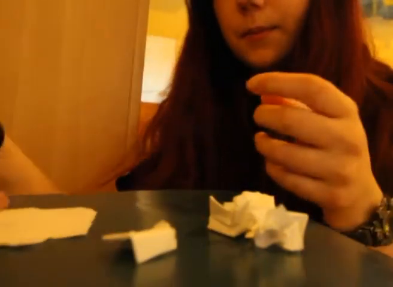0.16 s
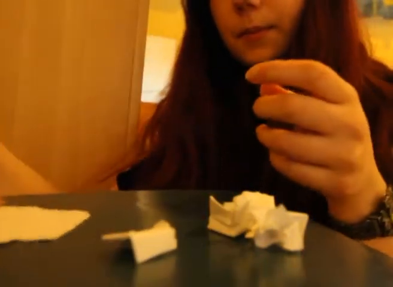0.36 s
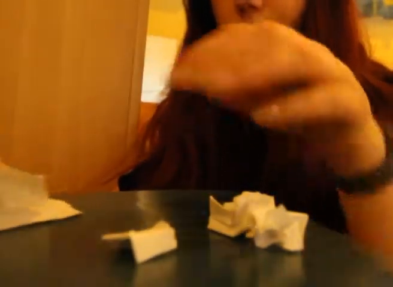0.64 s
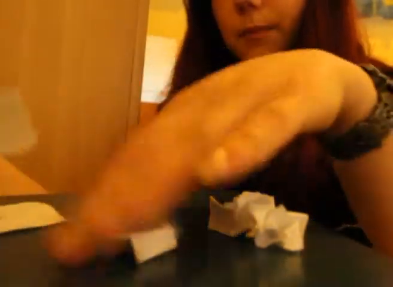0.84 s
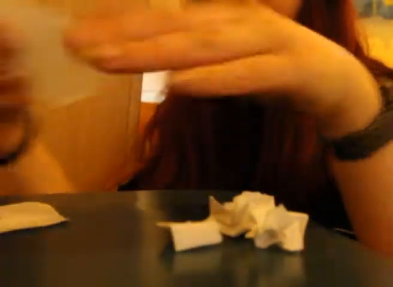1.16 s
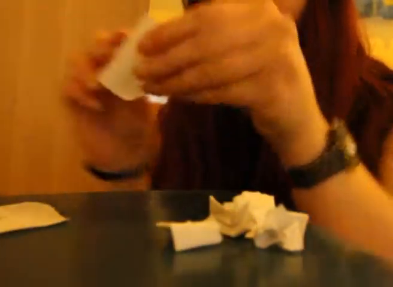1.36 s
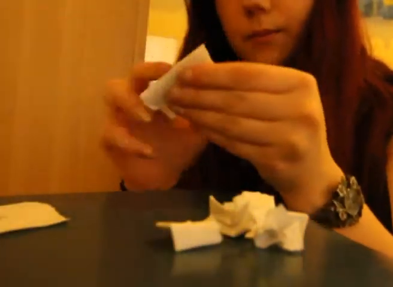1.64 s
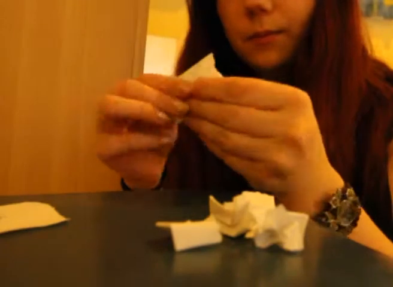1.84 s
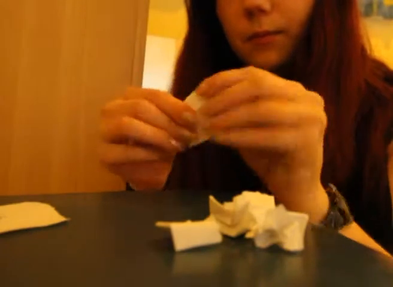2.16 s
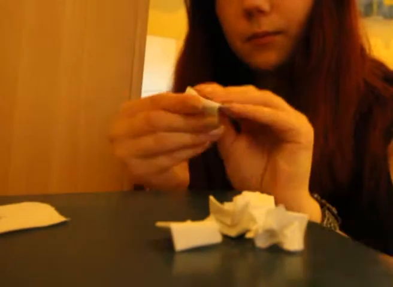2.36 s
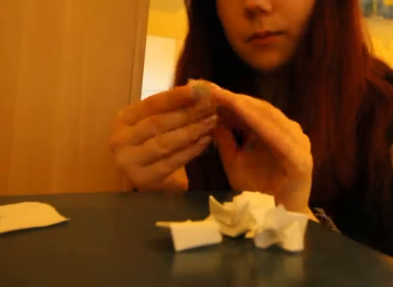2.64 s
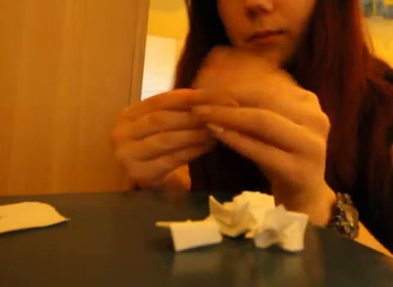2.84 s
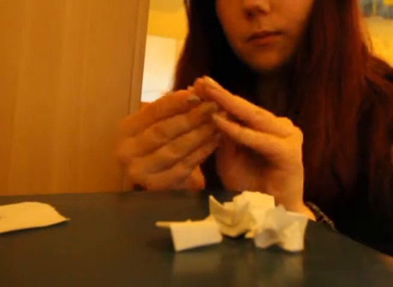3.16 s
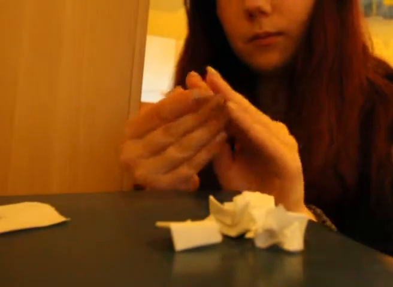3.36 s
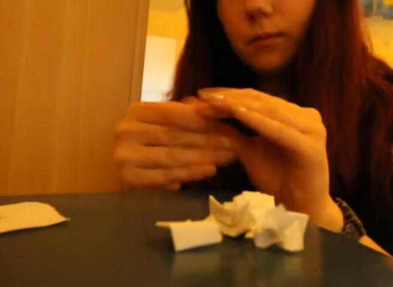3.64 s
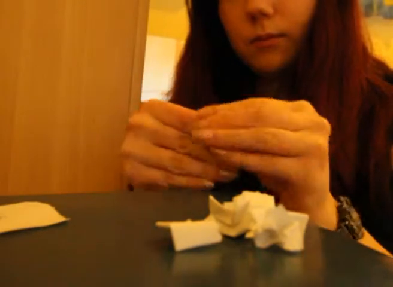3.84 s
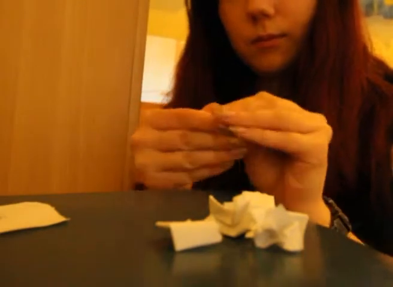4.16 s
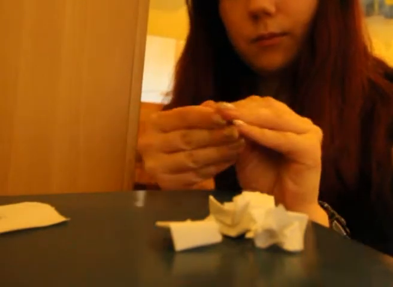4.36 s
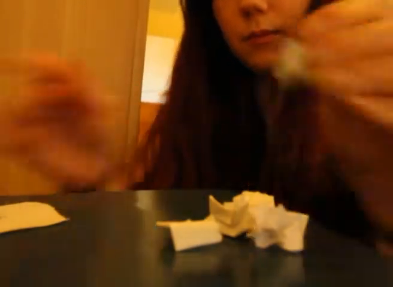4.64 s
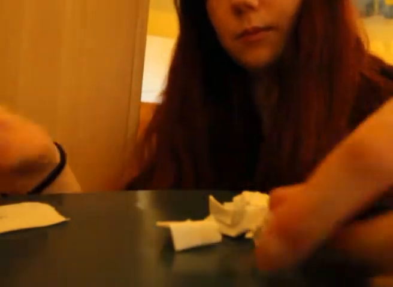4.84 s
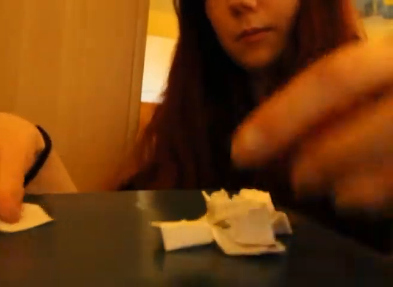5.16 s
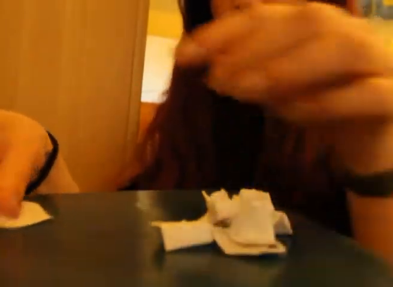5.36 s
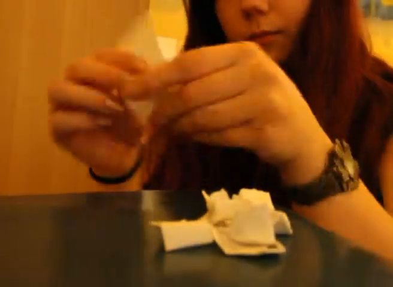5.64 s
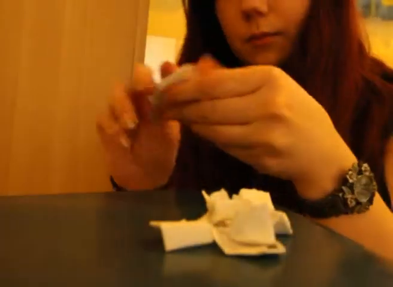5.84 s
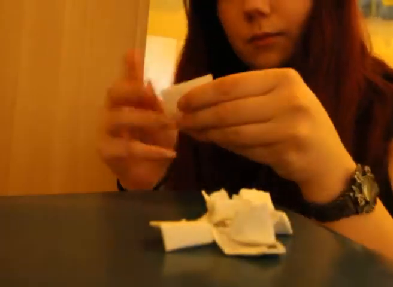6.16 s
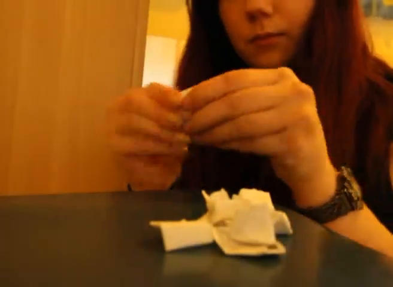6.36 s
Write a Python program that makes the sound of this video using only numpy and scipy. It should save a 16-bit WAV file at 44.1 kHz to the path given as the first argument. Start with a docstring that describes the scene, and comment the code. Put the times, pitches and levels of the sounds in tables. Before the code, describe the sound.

Close, dry paper handling: sharp creasing snaps and hissy rustles, a quieter fiddly folding stretch, then table bumps and louder crinkling over faint room hum.

```python
"""Fingers pick up, fold and crease small paper slips close to a microphone on a table.
Rustles (skin on paper, the sheet shaking on after a snap): grains ringing in broad resonances, a bright hiss.
Snaps of creasing paper and short bursts of rubbing: noise bursts through three bands. Low knocks (fingertips
on the table, hollow pops of cupped hands at some snaps): clicks ring decaying modes. A quiet room hums below
and answers with a short noise tail; the loudest snaps overload the recorder, which clips."""
import sys
import numpy as np
from scipy import signal
from scipy.fft import rfft, irfft
from scipy.io import wavfile

SR = 44100
rng = np.random.default_rng(int(sys.argv[2]) if len(sys.argv) > 2 else 0)


def materialize(psi):
    """Save the field psi as 16-bit PCM at rate SR to the path in sys.argv[1].

    A 1-D psi becomes a single channel; in a 2-D psi each row is a channel.
    """
    bounded = np.clip(np.atleast_2d(psi).T, -1, 1)
    quanta = np.round(bounded * 32767).astype(np.int16)
    wavfile.write(sys.argv[1], SR, quanta)


N = 287046
TRAVEL_S = 0.001   # delay of snaps; knocks take twice this


def from_db(db):
    """Decibels to gain."""
    return 10 ** (np.asarray(db, float) / 20)


def rms_one(x):
    """Scales each row to rms 1."""
    return x / np.sqrt(np.mean(x ** 2, axis=-1, keepdims=True) + 1e-20)


def peak_one(x):
    """Scales to peak 1."""
    return x / (np.max(np.abs(x)) + 1e-20)


def drift(rate_hz):
    """Slow random control of rms 1: noise twice through a one-pole low-pass."""
    pole = np.exp(-2 * np.pi * rate_hz / SR)
    noise = rng.standard_normal(N + SR)
    slow = signal.lfilter([1], [1, -2 * pole, pole * pole], noise)
    return rms_one(slow[SR:])   # first second is run-in


def resonance(x, hz, width_hz):
    """Two-pole resonance with gain about 1 on top."""
    r = np.exp(-np.pi * width_hz / SR)
    zeros = [(1 - r * r) / 2, 0, (r * r - 1) / 2]
    poles = [1, -2 * r * np.cos(2 * np.pi * hz / SR), r * r]
    return signal.lfilter(zeros, poles, x)


def band(x, low_hz, high_hz):
    """Butterworth band-pass along time."""
    sos = signal.butter(2, [low_hz, high_hz], "band", fs=SR, output="sos")
    return signal.sosfilt(sos, x)


def background():
    """Room and microphone noise as steady coloured noise; a distant unsteady motor as narrow noise bands."""
    # noise spectrum before scaling: (f/Hz, relative level/dB per Hz)
    air_spectrum = [(18, -65), (30, -6.5), (134, 3.5), (210, -9), (280, -2.5), (437, -9.5), (499, -3.5),
                    (684, -17), (7470, -25), (8080, -57), (11400, -35), (13000, -22), (16000, -26.5)]
    # motor hum: (f/Hz, width of each of two passes/Hz, rms level/dB)
    hum_bands = [(49.5, 5.2, -68.5), (118.6, 31, -61), (142.3, 6.1, -60)]
    air_rms_db = -55.5
    hz, level_db = np.transpose(air_spectrum)
    bins_hz = np.maximum(np.fft.rfftfreq(N, 1 / SR), 1)
    shape_db = np.interp(np.log(bins_hz), np.log(hz), level_db)
    air = irfft(rfft(rng.standard_normal(N)) * from_db(shape_db), N)
    out = from_db(air_rms_db) * rms_one(air)
    for f_hz, width_hz, rms_db in hum_bands:
        once = resonance(rng.standard_normal(N), f_hz, width_hz)
        out = out + from_db(rms_db) * rms_one(resonance(once, f_hz, width_hz))
    return out


def room(x):
    """Diffuse tail of unit energy: noise that sets in after the first wall and dies, treble first."""
    t60_s, wall_cut_hz = 0.65, 8200
    t = np.arange(SR // 2) / SR
    pole = np.exp(-2 * np.pi * wall_cut_hz / SR)
    noise = rng.standard_normal((2, len(t))) * (t > 0.004)
    tail = signal.lfilter([1 - pole], [1, -pole], noise[0]) * from_db(-60 * t / t60_s)
    tail += 1.67 * noise[1] * from_db(-60 * t / (0.55 * t60_s))   # full-band part, shorter
    return signal.fftconvolve(x, tail / np.sqrt(np.sum(tail ** 2)))[:N]


def knocks():
    """A click and a fading scuffle ring one set of decaying modes, those near each knock's pitch hardest."""
    # low knocks, fingertips on the table and hollow pops of cupped hands at some snaps:
    # (t/s, peak before mic band/dB, f of best-driven modes/Hz)
    low_knocks = [(0.047, -31, 409), (0.076, -11.5, 414), (0.104, -18, 640), (0.29, -27.5, 330),
                  (0.395, -35.5, 549), (0.472, -27.5, 180), (0.842, -12.5, 375), (0.91, -26, 600),
                  (1.256, -23, 640), (2.043, -29, 505), (2.414, -34, 640), (2.657, -22.5, 503),
                  (2.71, -25, 587), (4.773, -19.5, 243), (4.898, -11.5, 630), (4.941, -11, 450),
                  (5.264, -19.5, 443), (5.42, -30.5, 514), (5.547, -28, 546), (5.576, -20.5, 523),
                  (5.826, -27, 580)]
    # modes that all knocks ring: (f/Hz, level/dB, t60 before cap and thud/s)
    knock_modes = [(204, -26, .07), (247, 2, 0.058), (274, 10.5, 0.034), (403.5, 9, 0.1), (495, 10, 0.07),
                   (596, 2, 0.19), (696, 7.5, 0.17), (800, 0, 0.031), (983, 12.5, 0.093),
                   (1060, -13, 0.062)]
    scuffle_t60_s, t60_cap_s, scuffle_per_s, mic_low_hz = 0.23, 0.15, 250, 130
    out, t = np.zeros(N + SR), np.arange(SR // 4) / SR
    hz, level_db, t60_s = np.transpose(knock_modes)[:, :, None]
    decay = from_db(level_db - 60 * t / np.minimum(t60_s, t60_cap_s))
    rings = np.sin(2 * np.pi * hz * t) * decay * (1 - np.exp(-t / 0.0004))
    thud = from_db(-60 * t / 0.046) + 0.24   # first push dies fast, the modes ring on
    lucks_db = rng.normal(0, 2, (len(low_knocks), len(knock_modes)))
    shape = (len(low_knocks), len(t))
    scuffles = rng.standard_normal(shape) * (rng.random(shape) < scuffle_per_s / SR)
    for (s, peak_db, best_hz), luck_db, scuffle in zip(low_knocks, lucks_db, scuffles):
        strength = from_db(luck_db - 8 * np.abs(np.log2(hz[:, 0] / best_hz)))   # -8 dB per octave off
        clicks = 0.24 * scuffle * from_db(-60 * t / scuffle_t60_s)
        clicks[0] = 1
        knock = signal.fftconvolve(clicks, (strength @ rings) * thud)[:len(t)]
        at = round((s + 2 * TRAVEL_S) * SR)
        out[at:at + len(t)] += from_db(peak_db) * peak_one(knock)
    return band(band(out[:N], mic_low_hz, 7400), mic_low_hz, 7900)


def touch_db(rustle_db, bright_db):
    """Levels of skin hiss, sheet rustle and flexing: a light, bright touch hisses more, flexes less."""
    flex_db = rustle_db - 6.5 - 0.88 * bright_db
    return np.array([rustle_db + bright_db, rustle_db, flex_db])


def pressure():
    """Gains of hiss, rustle and flexing in time: rustles swell and fade over the faint noise of holding."""
    # paper held and shifting between rustles: (t/s, rustle level/dB, brightness/dB)
    holding = [(0.0, -63, -7), (0.11, -50, -3), (0.29, -44, -4), (0.45, -45, 0), (0.65, -57, -8),
               (1.01, -75, -4), (1.25, -51, 0), (1.4, -41, 6.5), (1.63, -47.5, -0.5), (1.79, -57, -10),
               (2.01, -51.5, 8), (2.3, -63, -1), (2.59, -46.5, 4), (2.85, -60.5, 0), (3.84, -56.5, -2),
               (4.31, -70.5, -14.5), (4.8, -59, 5), (4.97, -39, -6), (5.51, -63, 18), (5.76, -49, 6),
               (6.05, -42.5, 6), (6.2, -84, -6), (6.51, -36.5, -1)]
    # rustles, finger strokes and the sheet shaking on after a snap:
    # (t of top/s, rise/ms, fall/ms, rustle level/dB, brightness/dB)
    swells = [(0.051, 11, 13, -45.5, -15.5), (0.081, 4, 89, -33, -5), (0.235, 42, 29, -36, 11),
              (0.296, 21, 22, -27, 4.5), (0.432, 28, 53, -31.5, 6.5), (0.54, 84, 96, -39.5, 4.5),
              (0.637, 72, 13, -47, 10.5), (0.824, 24, 15, -57.5, 13), (0.848, 1.8, 63, -37, -12.5),
              (1.066, 74, 61, -60.5, 8), (1.206, 7.2, 23, -38.5, 4.5), (1.257, 4.4, 12, -28, -3),
              (1.408, 4, 51, -36, -10), (1.54, 64, 11, -41.5, 14.5), (1.608, 18, 13, -34, 5),
              (1.657, 32, 15, -33.5, 2), (1.754, 11.5, 39, -31.5, 4), (1.809, 27, 30, -40, 7.5),
              (2.042, 43, 45, -36, 3.5), (2.219, 51, 27, -39, 0.5), (2.32, 47, 13, -42.5, 4.5),
              (2.409, 31, 35, -35, 7), (2.499, 51, 40, -35, 7.5), (2.574, 20, 33, -41.5, 9.5),
              (2.657, 16, 21, -30.5, 5), (2.726, 23, 23, -35.5, 8), (2.858, 4.6, 23, -48, -7),
              (2.917, 6, 19, -45, -12), (2.965, 23, 24, -49.5, 3), (3.079, 30, 24, -45, 6.5),
              (3.182, 37, 52, -41.5, 6), (3.421, 13, 14, -43, 4.5), (3.556, 14, 13, -44.5, 0.5),
              (3.651, 22, 13, -45, 1.5), (3.709, 36, 22, -54, 2), (3.872, 33, 21, -48, 5.5),
              (4.018, 28, 49, -52.5, 12), (4.218, 8, 36, -66, 12), (4.264, 12, 19, -53, 10),
              (4.371, 11, 34, -56.5, 8), (4.5, 14.4, 19.5, -42.5, 8.5), (4.661, 27, 36, -57.5, 9.5),
              (4.778, 6.9, 36, -44, -6), (4.907, 15.6, 11, -30, -9.5), (4.943, 19, 12, -32.5, -12.5),
              (5.03, 14, 17, -32, -1), (5.124, 34, 12, -36, 6.5), (5.163, 4, 58, -35, -1.5),
              (5.226, 10, 37, -34.5, 3.5), (5.271, 7.5, 17.7, -21.5, -5.5), (5.344, 21, 38, -37.5, 7.5),
              (5.483, 47, 6.3, -41.5, 8.5), (5.664, 78, 43, -36, 4.5), (5.736, 6.1, 21, -33.5, -14),
              (5.838, 29, 35, -27.5, 1.5), (5.995, 16, 20, -31, -3.5), (6.112, 2, 22, -34, -7.5),
              (6.248, 12, 14, -37, 3.5), (6.337, 53, 31, -45.5, 6), (6.368, 22, 9.8, -45, 6),
              (6.463, 39, 96, -38.5, 7)]
    step_db, shortest_ms, reach_s = 8.5, 2, 0.3   # step_db: drop after one rise or fall time
    t = np.arange(N) / SR
    s, *columns = np.transpose(holding)
    power = from_db(touch_db(*[np.interp(t, s, c) for c in columns])) ** 2
    for top_s, rise_ms, fall_ms, rustle_db, bright_db in swells:
        near = slice(max(round((top_s - reach_s) * SR), 0), round((top_s + reach_s) * SR))
        side_ms = np.where(t[near] < top_s, max(rise_ms, shortest_ms), max(fall_ms, shortest_ms))
        steps = np.abs(t[near] - top_s) * 1e3 / side_ms
        swell_db = touch_db(rustle_db, bright_db)[:, None] - step_db * steps ** 1.044
        power[:, near] += from_db(swell_db) ** 2
    return np.sqrt(power)


def bend():
    """Pitch of the sheet in time: the slip bends, and a restless grip wanders around that pitch."""
    # sheet pitch before wander: (t/s, f/Hz)
    bend_path = [(0.0, 5200), (0.1, 4300), (0.4, 3840), (0.84, 4430), (1.25, 3600), (1.4, 5600),
                 (1.5, 4360), (1.75, 4440), (2.21, 3130), (2.4, 4250), (2.55, 4700), (3.2, 4950),
                 (4.3, 5000), (4.9, 4350), (5.03, 3500), (5.3, 3540), (5.6, 2670), (5.99, 2920),
                 (6.1, 3400), (6.51, 3600)]
    wander_oct = 0.19   # rms
    path_hz = np.interp(np.arange(N) / SR, *np.transpose(bend_path))
    return path_hz * 2 ** (wander_oct * drift(5.3))


def ticks(rustle_gain):
    """Lesser snaps at random moments, their level following the handling around them."""
    count, over_rustle_db, spread_db = 60, 14.5, 1.5
    mid_flap_hz, mid_flap_db, mid_edge_db = 1900, -7, 10
    when_s = rng.random(count) * (N - 100) / SR
    luck = rng.standard_normal((count, 4))
    around_db = 20 * np.log10(rustle_gain[(when_s * SR).astype(int)])
    peak_db = around_db + over_rustle_db + spread_db * luck[:, 0]
    flap_hz = mid_flap_hz * 2 ** (0.42 * np.tanh(luck[:, 1]))
    flap_db = mid_flap_db + 4 * luck[:, 2]
    edge_db = mid_edge_db + 6 * luck[:, 3]
    return list(zip(when_s, peak_db, flap_hz, flap_db, edge_db))


def snaps(bursts, bend_hz):
    """Snap or short rub: one crack, then noise dying in a few ms, heard through flap, sheet and edge."""
    t60_ms = 14.8
    out, t = np.zeros(N + 4096), np.arange(1024) / SR
    noises = rng.standard_normal((len(bursts), len(t)))
    for (s, peak_db, flap_hz, flap_db, edge_db), noise in zip(bursts, noises):
        burst = noise * from_db(-60e3 * t / t60_ms) * (1 - np.exp(-t / 0.0004))
        burst[4] += 4.23 * np.sign(noise[0])   # the crack itself
        heave = 0.35 * burst
        heave[4] = 2 * burst[4]   # the large flap answers mostly to the first crack
        at = round((s + TRAVEL_S) * SR)
        flap = band(heave, flap_hz / 1.3, flap_hz * 1.6)
        sheet = band(burst, bend_hz[at] / 1.55, bend_hz[at] * 1.505)
        edge = band(burst, 7430, 14040)
        mix = from_db([flap_db, 0, edge_db]) @ rms_one(np.array([flap, -sheet, edge]))
        out[at:at + len(t)] += from_db(peak_db) * peak_one(mix)
    return out[:N]


def grains(per_s, spread_db):
    """Tiny stick-slip clicks of uneven size and random sign."""
    sizes_db = spread_db * np.minimum(rng.exponential(1, N), 5)
    clicks = from_db(sizes_db) * rng.choice([-1, 1], N)
    return clicks * (rng.random(N) < per_s / SR)


def rustle(modes, per_s, spread_db, patchy_db, clump, favour_db=lambda hz: 0):
    """Grains ring in broad resonances, two passes each; each one swells as the grip shifts."""
    out = 0
    for hz, width_hz, level_db in modes:
        once = resonance(grains(per_s, spread_db), hz, width_hz)
        rung = resonance(once, hz, width_hz * 2)
        out = out + rms_one(rung) * from_db(level_db + patchy_db * drift(10.9) + favour_db(hz))
    return rms_one(out * clump)


def rustling(gains, bend_hz):
    """Skin on paper and the shaking sheet: hiss, sheet rustle and slow flexing share one clumping."""
    # resonances, all three: (f/Hz, first-pass width/Hz, relative level/dB)
    skin_modes = [(7960, 570, -13.5), (10320, 4000, 1), (11500, 2030, -1.5), (13350, 640, -8.5),
                  (14500, 1600, -13.5)]
    sheet_modes = [(2726, 410, 1), (3630, 1220, -0.5), (4940, 2370, 3.5), (5240, 2500, -22),
                   (6580, 2900, 6.5)]
    flex_modes = [(525, 460, -0.5), (990, 620, -4.5), (1520, 1380, 5), (2370, 1500, -14)]
    clump = from_db(1.88 * drift(26.3) + 1.0 * drift(120))

    def near_bend_db(hz):
        """Loss away from the bend's pitch, 8 dB at an octave and beyond."""
        return -8 * np.minimum(np.abs(np.log2(hz / bend_hz)), 1)

    skin = rustle(skin_modes, per_s=15000, spread_db=3.0, patchy_db=2.2, clump=clump)
    sheet = rustle(sheet_modes, per_s=5000, spread_db=3.8, patchy_db=2.5, clump=clump,
                   favour_db=near_bend_db)
    flex = rustle(flex_modes, per_s=4000, spread_db=3.0, patchy_db=2.2, clump=clump)
    return np.sum(gains * [skin, sheet, flex], axis=0)


def scene():
    """Paper with its echo off the table top, low knocks, the room tail, the background."""
    # snaps of creasing paper and short bursts of rubbing:
    # (t/s, peak level/dB, flap f/Hz, flap over sheet/dB, edge over sheet/dB)
    main_bursts = [(0.046, -15.5, 1070, -12, -22), (0.076, -3, 710, -5.5, -2),
                   (0.106, -12.5, 689, -16, -11), (0.292, 4, 1800, -10, -3), (0.301, -6, 1860, 0, 22),
                   (0.326, -10, 1190, 10, 19), (0.398, -22, 1820, 9, 7), (0.718, -28.5, 1780, -1, 5),
                   (0.843, 1, 1700, -5.5, 1), (0.909, -20, 969, 1, 3), (0.933, -22, 1610, -2, -5),
                   (1.205, -26, 1760, 16, 0), (1.254, -25, 830, 14, 1), (1.4, 7, 1720, -0.9, -9.5),
                   (1.475, -15.5, 1570, -30, -9), (1.602, -24, 1110, 6, 9), (1.668, -16, 1080, 7, 5),
                   (1.73, -22, 1260, 8, -15), (1.75, -17, 1180, -6, 17), (1.994, -26, 1720, 11, 12),
                   (2.213, -8, 970, -15.5, -8.5), (2.384, -19, 1600, -15, -12),
                   (2.417, -18, 1500, -0.5, -1), (2.491, -14, 1740, -11, -22), (2.627, -14.5, 1850, -2, -5),
                   (2.638, -13, 1700, -12, 5), (2.649, -6, 1730, -15, 16), (2.658, -4, 1060, 12, 17),
                   (2.712, -12.5, 1230, 14, -1), (2.725, -16, 1170, 19, 21), (2.754, -18.5, 1380, 15, 0),
                   (2.852, -23, 1770, 6, 9), (2.87, -27.5, 517, -17, -26), (2.91, -11, 1380, 7, -4.5),
                   (2.962, -24, 1430, -1, 23), (3.046, -26, 1640, -3.5, -16), (3.152, -27, 1850, -17, -11),
                   (3.418, -28, 1570, 12, 13), (3.55, -36, 501, 0, -10), (3.637, -26.5, 1710, 0, 0),
                   (4.21, -31.5, 501, 1, 35), (4.259, -38, 509, 14, 17), (4.364, -24, 571, 11, 32),
                   (4.484, -29, 1880, 13, -1), (4.492, -20, 1540, 13, 18), (4.775, -25, 1160, 13, 5),
                   (4.851, -27.5, 603, 12, 13), (4.9, -3, 686, -11, -5), (4.943, -7, 950, 31, 28),
                   (4.995, -14.5, 600, 22, 25), (5.022, -13, 1600, -14, -10), (5.033, -22, 1700, -20, -15),
                   (5.152, -15, 1850, -13, 26), (5.267, 6.5, 1930, -17, 0.5), (5.273, -1.5, 1850, -4, 1),
                   (5.295, -19, 1900, -3, 0), (5.428, -27, 870, 28, 10), (5.464, -21.5, 920, -2, 3),
                   (5.492, -18, 496, -7, 15), (5.549, -14.5, 1070, 13, 15), (5.576, -15.5, 535, 1.5, -18),
                   (5.725, -2, 1580, 2, -1.5), (5.734, -6, 970, 7, -6), (5.788, -15, 1750, -8, 11),
                   (5.828, 1.5, 624, -13, 2.5), (5.944, -16.5, 1870, -8, 6), (5.986, -7, 1560, -2.5, 0.5),
                   (6.027, -11.5, 1600, 0, 16), (6.103, 0, 1020, 1.5, 2.5), (6.159, -21, 860, 1, 21),
                   (6.182, -20.5, 1700, 23, -16), (6.214, -25, 1840, 2, 6), (6.246, -16, 1650, 4, 26),
                   (6.282, -16.5, 1400, -12, 20)]
    table_echo_s, table_echo_db, room_db = 0.0017, -17, -13.5
    gains, bend_hz = pressure(), bend()
    paper = rustling(gains, bend_hz) + snaps(main_bursts + ticks(gains[1]), bend_hz)
    lag = round(table_echo_s * SR)
    paper[lag:] += from_db(table_echo_db) * paper[:-lag]
    near = paper + knocks()
    return (near + from_db(room_db) * room(near) + background())[None]


def record(dry):
    """Recorder: full scale clips, then a steep low-pass cuts the top."""
    cutoff_hz = 16250
    sos = signal.ellip(10, 0.5, 70, cutoff_hz - 150, fs=SR, output="sos")   # passband edge 150 Hz lower
    return np.clip(signal.sosfilt(sos, np.clip(dry, -1, 1)), -1, 1)


dry = scene()
out = record(dry)
materialize(out)
```